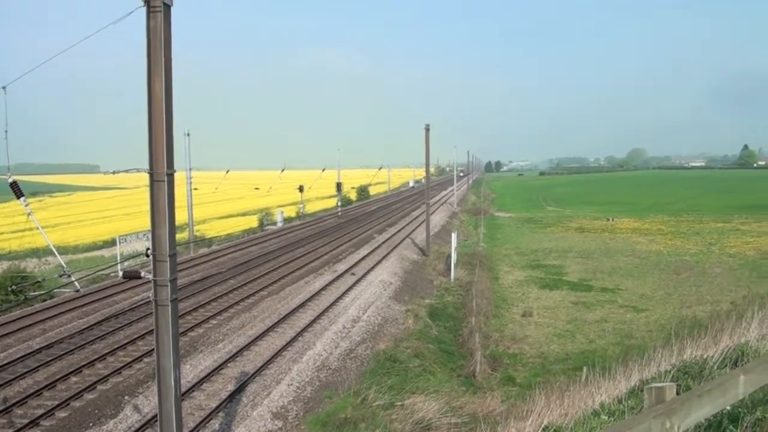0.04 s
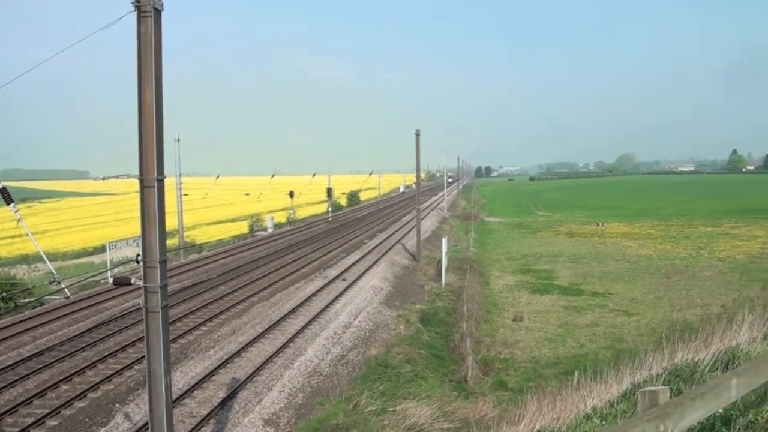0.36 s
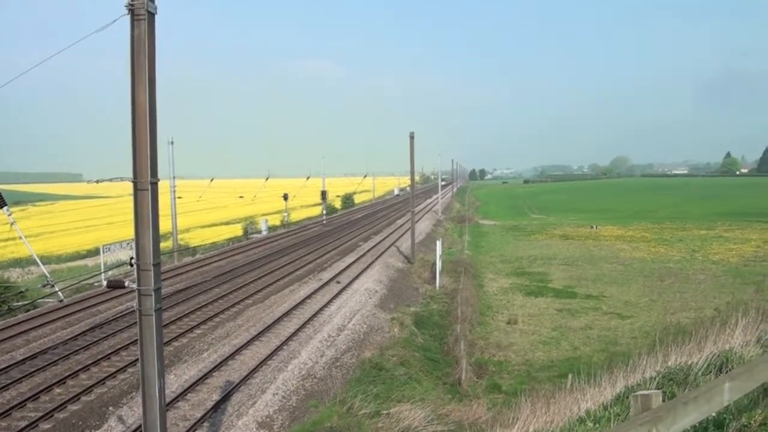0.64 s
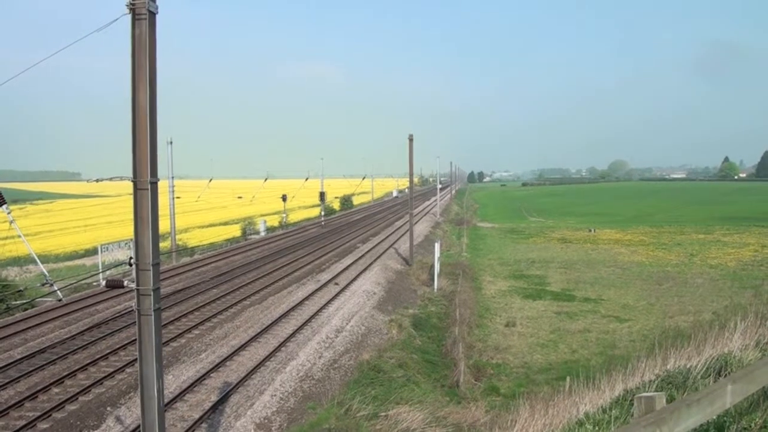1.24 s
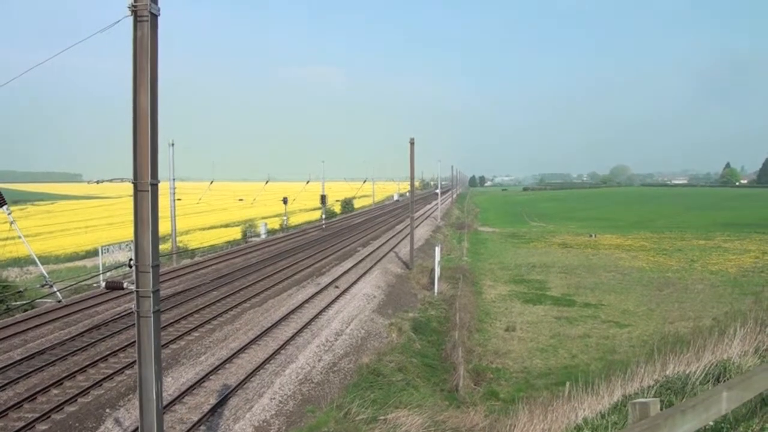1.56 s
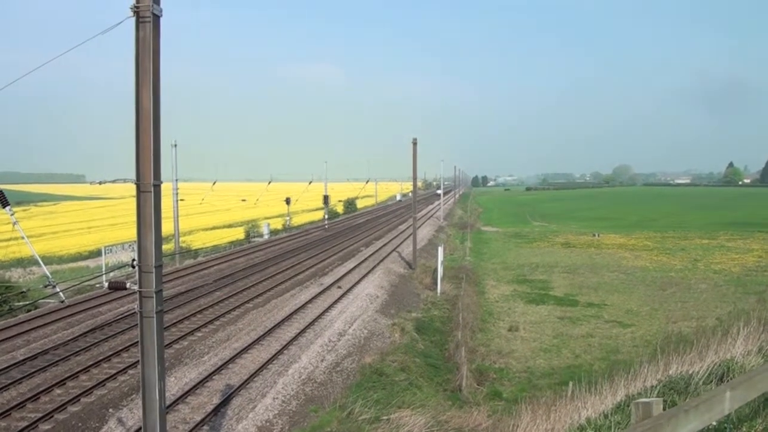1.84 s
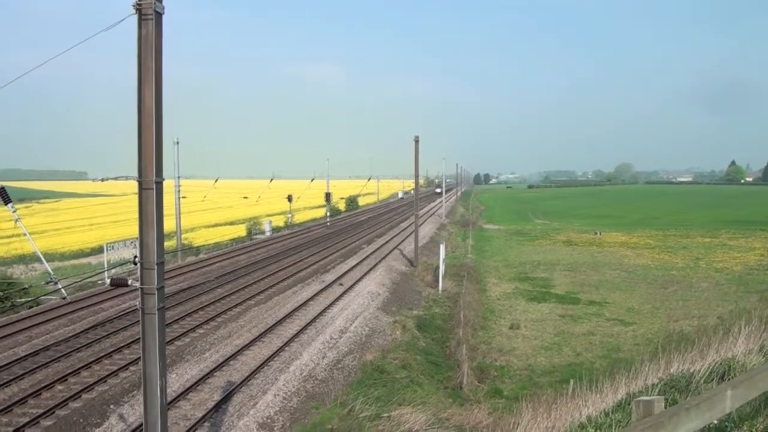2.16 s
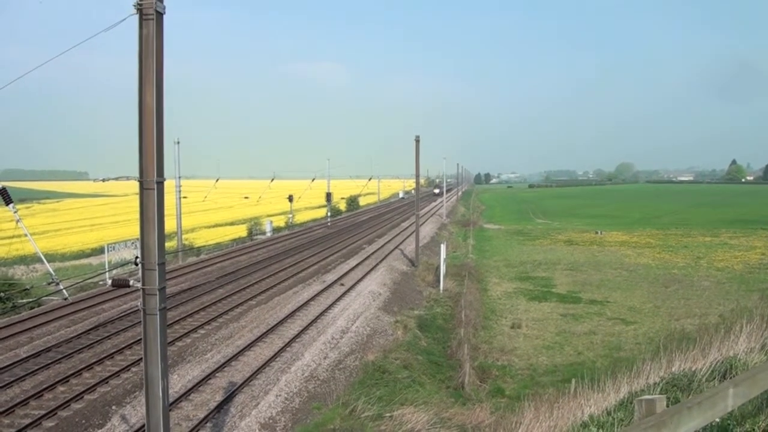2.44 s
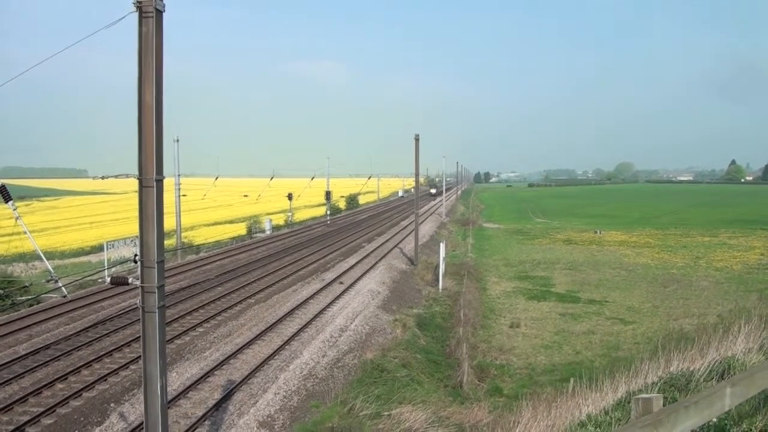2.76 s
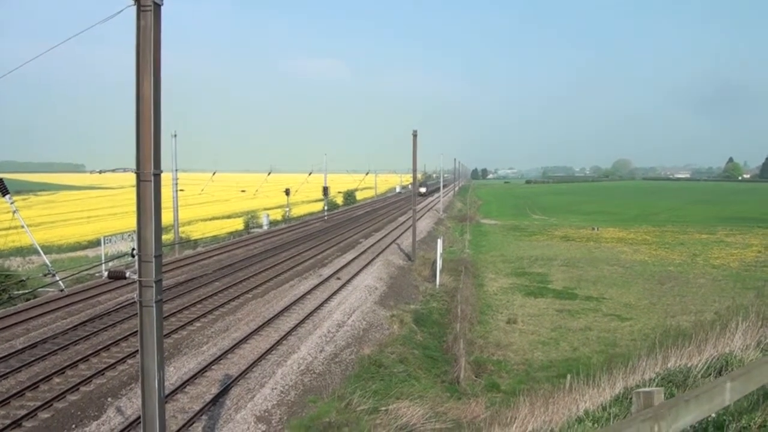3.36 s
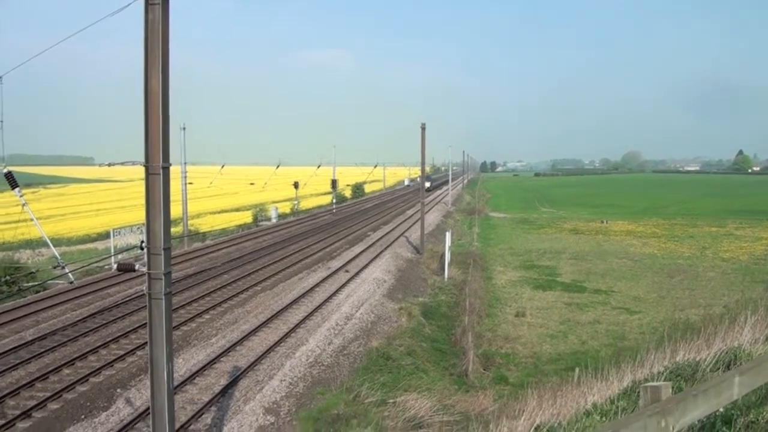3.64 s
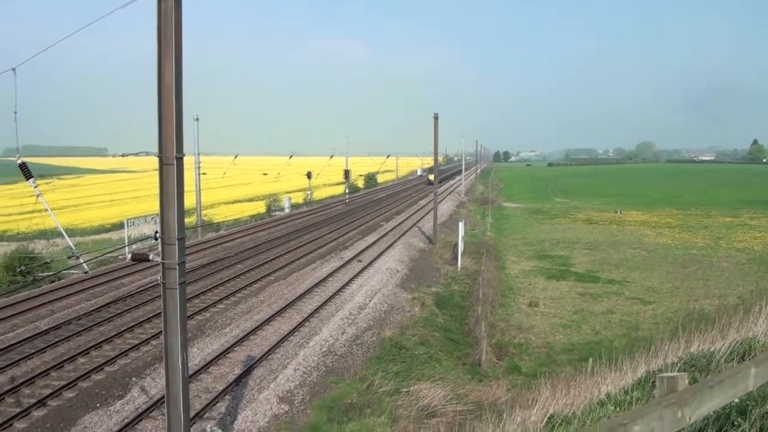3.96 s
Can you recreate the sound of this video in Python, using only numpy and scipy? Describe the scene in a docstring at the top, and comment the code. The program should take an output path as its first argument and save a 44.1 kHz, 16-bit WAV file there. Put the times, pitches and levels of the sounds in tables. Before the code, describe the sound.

A fast train approaches over open fields, its distant rumble and roar growing louder throughout the four seconds while the rails ring and hiss. In the first second a small bird whistles a few short notes, with faint ticks until about 1.1 seconds. Wavering wheel tones swell from around 3 seconds, a fine sizzle rises last, and one short, crisp scuff sounds close by at 3.75 seconds.

```python
"""A distant roar and singing rails come first: a fast train is approaching over open fields.
Its rolling wheels rumble and roar ever louder, and the rails carry their ringing and hiss ahead of it.
Early on a small bird whistles and a few faint ticks sound. Wavering wheel tones swell as the train
nears, a fine sizzle arrives last, and near the end comes one short, crisp scuff close by."""
import sys
import numpy as np
from scipy import signal
from scipy.fft import rfft, irfft
from scipy.io import wavfile
from scipy.ndimage import uniform_filter1d

SR = 44100
rng = np.random.default_rng(int(sys.argv[2]) if len(sys.argv) > 2 else 0)


def generate_wav(signal):
    """Clip the signal to [-1, 1] and save it as 16-bit WAV at the path in sys.argv[1]."""
    frames = np.transpose(np.atleast_2d(signal))
    scaled = np.clip(frames, -1, 1) * 32767
    pcm = np.round(scaled).astype(np.int16)
    wavfile.write(sys.argv[1], SR, pcm)


N = 176400
T = np.arange(N) / SR
HZ = np.fft.rfftfreq(N, 1 / SR)


def amp(db):
    """Decibels to gain."""
    return 10 ** (np.asarray(db) / 20)


def unit_rms(x):
    """Scales to rms 1."""
    return x / np.sqrt(np.mean(x ** 2) + 1e-20)


def curve(points):
    """Spreads (f, value) rows over the spectrum on a log-frequency axis."""
    f, value = np.transpose(points)
    return np.interp(np.log(HZ + 1), np.log(f + 1), value)


def fader(points):
    """Gain over time from (t/s, level/dB) rows."""
    return amp(np.interp(T, *np.transpose(points)))


def swell(peak_s, spread_s):
    """A bell-shaped rise and fall in time."""
    return np.exp(-((T - peak_s) / spread_s) ** 2)


def noise(shape):
    """Noise of rms 1 with the given gain per frequency."""
    return unit_rms(irfft(rfft(rng.standard_normal(N)) * shape, N))


def drift(rate_hz):
    """Random motion up to about the given rate."""
    return noise((HZ > 1) / (1 + (HZ / rate_hz) ** 4))


def ring(hz, width_hz):
    """A resonance kept ringing by random rolling contact."""
    return noise(1 / (1 + ((HZ - hz) / (.75 * width_hz)) ** 2))


def rush(eq, patch_db=1.0):
    """Coloured noise in drifting patches, as heard through moving air."""
    frames = signal.stft(noise(amp(curve(eq))), nperseg=1024, noverlap=768)[2]
    patches = uniform_filter1d(rng.standard_normal(frames.shape), size=14, axis=0)  # smooth in frequency
    patches = unit_rms(uniform_filter1d(patches, size=16, axis=1))  # and in time
    frames = frames * amp(patch_db * patches)
    return unit_rms(signal.istft(frames, nperseg=1024, noverlap=768)[1][:N])


# Fader rides for carriage rumble, rolling roar and wheel-on-rail hiss: t/s, relative level/dB
RUMBLE_RIDE = [(0, -44), (.6, -42), (1.3, -40), (1.95, -36), (2.6, -36.3), (2.85, -32), (3.5, -29.5),
               (4, -28)]
ROAR_RIDE = [(0, -37.5), (.4, -37.5), (1.3, -35.7), (2.26, -33.2), (2.83, -28.2), (3.21, -30), (3.64, -26),
             (4, -25.8)]
HISS_RIDE = [(0.0, -45), (0.39, -43.5), (0.48, -40.5), (0.68, -45.5), (0.7, -43), (1.0, -45.5),
             (1.95, -35.5), (2.89, -33.5), (2.94, -34), (3.4, -28), (3.5, -30), (3.98, -29)]
# EQ of the dark rumble, midrange roar and bright hiss: f/Hz, relative level/dB
RUMBLE_EQ = [(40, -59), (100, -35), (180, -18.5), (250, -9), (350, -2), (400, -3), (470, 1), (530, -2.5),
             (640, 1), (900, -5.5), (2000, -47)]
ROAR_EQ = [(150, -45), (400, -22), (600, -9), (680, -3.5), (730, -0.5), (900, 0.5), (1020, 0.5),
           (1200, -1.5), (1650, -1.5), (1850, -2.5), (2300, -12), (3500, -32), (6000, -45)]
HISS_EQ = [(1200, -26), (2200, 2.5), (2800, 2), (3300, -0.5), (4000, -5), (4900, -7.5), (5900, -16),
           (6800, -20.5), (7500, -26), (9000, -38), (15000, -57)]
def rolling():
    """Carriages rumble and wheels roar and hiss on the rails, building as the train nears."""
    rumble = fader(RUMBLE_RIDE) * rush(RUMBLE_EQ)
    roar = amp(3.5) * fader(ROAR_RIDE) * rush(ROAR_EQ)
    hiss = amp(1.24) * fader(HISS_RIDE) * rush(HISS_EQ)
    return rumble + roar + hiss


def song(modes, surges, start_db, rise_db_per_s, flutter_db=1.5):
    """A cluster of rail resonances beats, flutters and grows louder, surging now and then."""
    cluster = sum(amp(db) * ring(hz, width) for hz, width, db in modes)
    cluster = cluster / np.sqrt(uniform_filter1d(cluster ** 2, size=5000) + 1e-9)  # level out slow beats
    surge_db = sum(db * swell(s, spread) for s, spread, db in surges)
    return cluster * amp(start_db + rise_db_per_s * T + surge_db + flutter_db * drift(rate_hz=31.3))


# Resonances in the low and the upper song of the rails: f/Hz, width/Hz, relative level/dB
LOW_MODES = [(733, 28, -9), (813, 29, -7), (845, 83, -5.5), (891, 10.7, -4), (920.2, 23, -2.5),
             (951, 73, -8), (1008, 28, -10)]
UPPER_MODES = [(1983, 19, -11), (2010, 15, -20), (2034, 6.1, -11.5), (2053, 7.9, -6.5), (2078.5, 11, -5),
               (2145, 8, -15)]
# Surges that push each song forward: t/s, spread/s, boost/dB
LOW_SONG_SURGES = [(.36, 0.021, 3), (1.18, 0.05, 4), (1.36, .04, 4.5), (1.638, 0.016, 6.5),
                   (1.883, 0.01, 8), (2.01, 0.18, 3.5), (2.39, 0.019, 7), (2.714, 0.011, 3.5),
                   (2.789, 0.01, 3), (2.9, 0.026, 5), (3.02, 0.072, 3), (3.125, 0.015, 8.5),
                   (3.174, 0.032, 9.5), (3.92, 0.015, 2.5)]
UPPER_SONG_SURGES = [(1.0, .05, 2), (1.21, 0.095, 6), (1.55, 0.11, 3.5), (1.95, 0.059, 4.5),
                     (3.49, 0.032, 5), (3.68, 0.045, 4.5)]
# Thin ringing around the songs: f/Hz, width/Hz, starting level/dB, rise/(dB per s)
THIN_RINGS = [(231, 20, -55, 0.36), (470.4, 52, -53.5, 4.5), (6220, 53, -56, 2), (6310, 160, -60.5, 1),
              (6520, 420, -65, 4.5), (9550, 260, -76.5, 4.5), (10520, 170, -75.5, 4), (11920, 260, -71, 3)]
def rails():
    """Set ringing by the wheels, the rails sing ahead of the train."""
    low = song(LOW_MODES, LOW_SONG_SURGES, start_db=-36, rise_db_per_s=3.0)
    upper = song(UPPER_MODES, UPPER_SONG_SURGES, start_db=-42, rise_db_per_s=3.5)
    thin = sum(amp(db + rise * T) * ring(hz, width) for hz, width, db, rise in THIN_RINGS)
    return low + upper + thin


# EQ of the ambience bed: f/Hz, relative level/dB
AIR_EQ = [(15, -24), (30, -24), (50, -3), (90, 2), (180, 6), (400, 1), (1500, -7), (5000, -39),
          (8000, -16.5), (15500, -16)]
# Its stereo image, widest at the top: f/Hz, left-right correlation
AIR_IMAGE = [(30, .92), (150, 0.95), (300, 0.99), (700, 1), (5000, 1), (7500, 0.71), (15000, .2)]
def air():
    """A steady bed of still air and faint hiss, slightly different left and right."""
    correlation = np.clip(curve(AIR_IMAGE), -1, 1)
    spectra = rfft(rng.standard_normal((2, N))) * amp(curve(AIR_EQ))
    mid, side = spectra * np.sqrt([1 + correlation, 1 - correlation])
    return amp(-50.5) * unit_rms(irfft(np.array([mid + side, mid - side]), N))


# The bird's phrase: t/s, length/s, start f/Hz, end f/Hz, level/dB
BIRD_NOTES = [(.095, 0.046, 2450, 2500, -40), (.148, .075, 4410, 4370, -48.5), (.225, .11, 4378, 4410, -57),
              (0.408, 0.061, 3130, 3480, -43), (.625, 0.15, 4380, 4365, -53),
              (.675, .05, 4340, 4380, -44.5), (0.722, .06, 3330, 3290, -48)]
def bird(echo_t60_s=0.54, echo_db=-11):
    """A small bird whistles short, pure glides with a faint outdoor echo."""
    notes = np.zeros(N)
    for s, length, start_hz, end_hz, db in BIRD_NOTES:
        progress = np.clip((T - s) / length, 0, 1)
        envelope = np.sqrt(2 * abs(np.sin(np.pi * progress)))
        pitch_hz = start_hz + (end_hz - start_hz) * progress
        notes += amp(db) * envelope * np.sin(2 * np.pi * np.cumsum(pitch_hz) / SR)
    tail = rng.standard_normal(N) * np.exp(-np.log(1000) * T / echo_t60_s)
    echo = signal.fftconvolve(notes, tail / np.linalg.norm(tail))[:N]
    return notes + amp(echo_db) * echo


# Three faint ticks, then two hits that merge into the close scuff: t/s, spread/s, level/dB
SCUFF_HITS = [(.625, .005, -52), (.742, .006, -57), (1.06, .005, -50), (3.75, 0.0052, -29),
              (3.763, 0.014, -31.5)]
# Their crisp EQ: f/Hz, relative level/dB
SCUFF_EQ = [(2000, -34), (4000, -1), (6000, 1), (7600, -4), (9000, -11), (12000, -19), (15500, -25)]
def scuffs():
    """Brief, bright bursts of noise, heard as ticks and a scuff."""
    envelope = sum(amp(db) * swell(s, spread) for s, spread, db in SCUFF_HITS)
    return envelope * noise(amp(curve(SCUFF_EQ)))


# Tones of the wheels: f/Hz, wander/Hz, peak t/s, spread/s, peak level/dB
WHEEL_MODES = [(1796, 3.5, 3.5, 0.2, -32), (1125, 3.6, 3.67, 0.65, -31.5), (1237, 6.5, 3.18, .3, -38),
               (643, 9.8, 3.26, 1, -37.5), (435.4, 5.1, 3.55, 0.7, -43), (3045, 15.5, 4, .7, -42)]
def wheel_tones(waver_hz=18, flicker_db=3):
    """Wheel modes swell as the train nears, each wavering in pitch and strength."""
    tones = np.zeros(N)
    for hz, wander, s, spread, db in WHEEL_MODES:
        cycles = np.cumsum(hz + wander * drift(waver_hz)) / SR
        tone = np.sin(2 * np.pi * cycles) * amp(flicker_db * drift(waver_hz))
        tones += amp(db) * swell(s, spread) * unit_rms(tone)
    return tones


# EQ of the top-end sizzle: f/Hz, relative level/dB
SIZZLE_EQ = [(4000, -6), (6700, 4.5), (7500, -1), (9000, -6), (12000, -16), (15500, -46)]
def sizzle(end_db=-44, rise_db_per_s=12.5):
    """The fine sizzle of rolling wheels fades up steeply and arrives last."""
    return amp(end_db + rise_db_per_s * (T - T[-1])) * rush(SIZZLE_EQ)


def scene():
    """Train, bird and scuffs sit dead centre over the stereo bed of air."""
    return rolling() + rails() + air() + bird() + scuffs() + wheel_tones() + sizzle()


def record(dry, cutoff_hz=15750):
    """A steep low-pass trims the very top of the mix."""
    lowpass = signal.firwin(1023, cutoff_hz, window=("kaiser", 9), fs=SR)
    return signal.oaconvolve(dry, lowpass[None], "same")


dry = scene()
out = record(dry)
generate_wav(out)
```